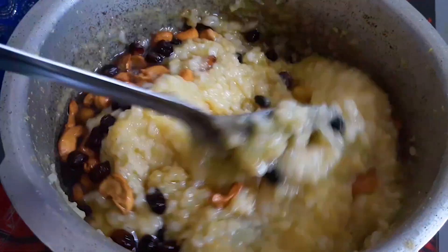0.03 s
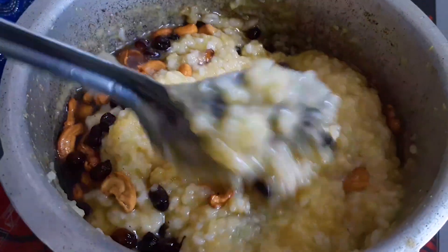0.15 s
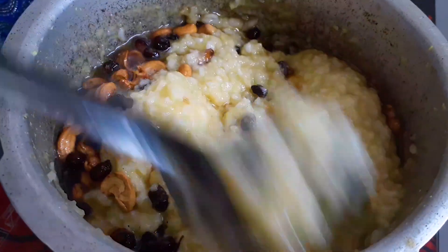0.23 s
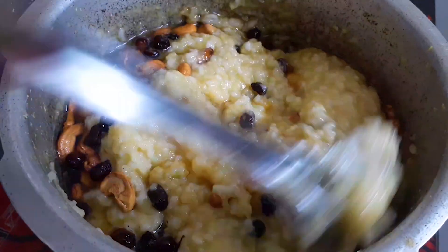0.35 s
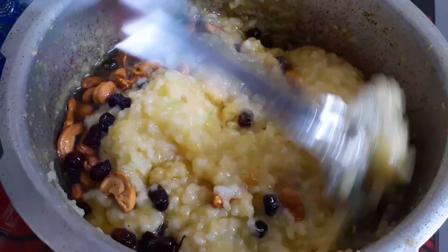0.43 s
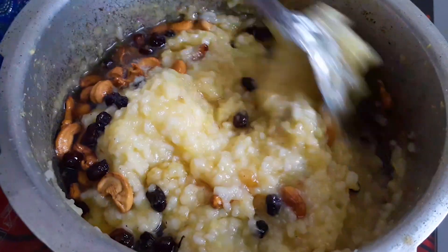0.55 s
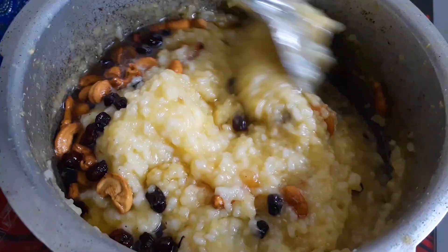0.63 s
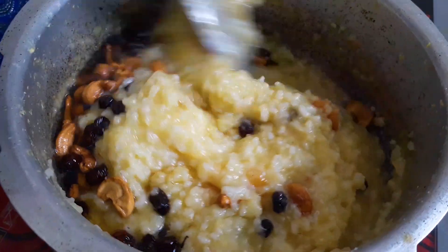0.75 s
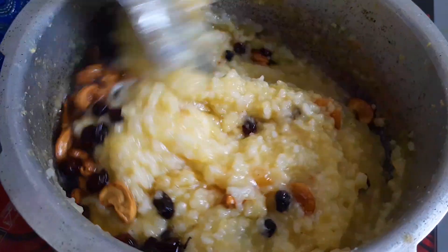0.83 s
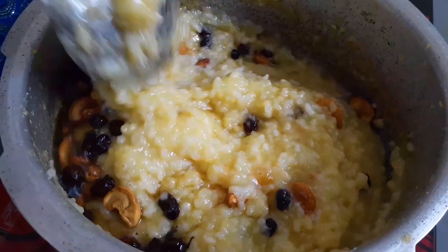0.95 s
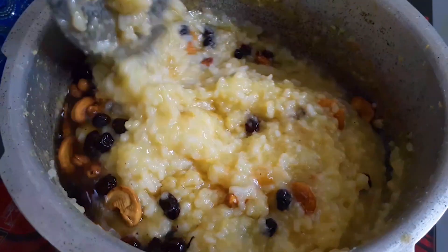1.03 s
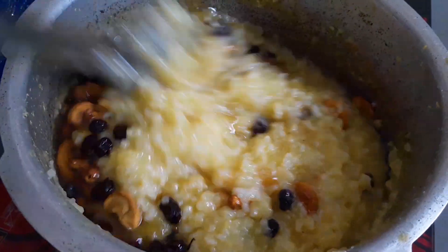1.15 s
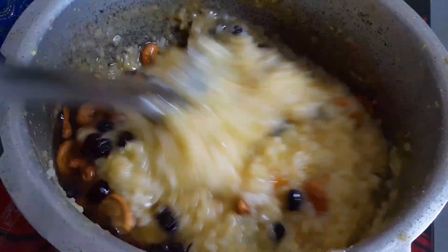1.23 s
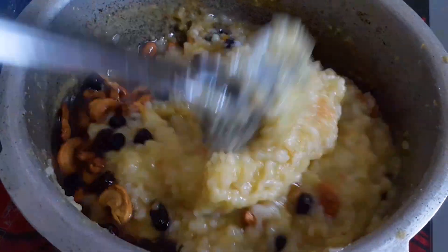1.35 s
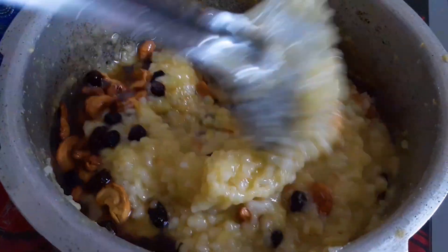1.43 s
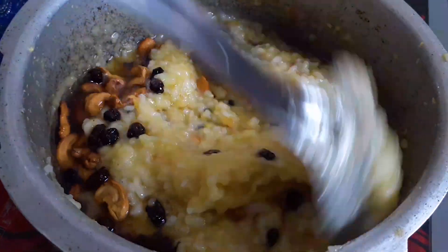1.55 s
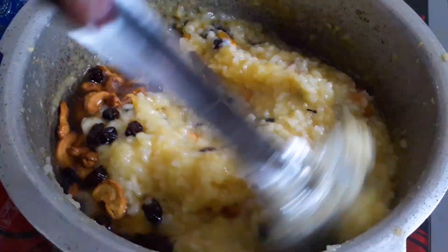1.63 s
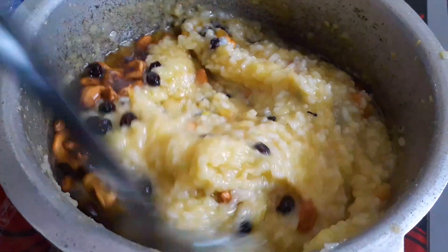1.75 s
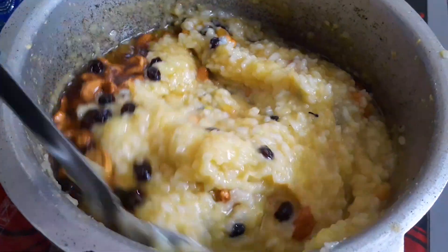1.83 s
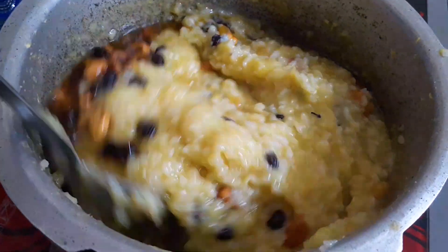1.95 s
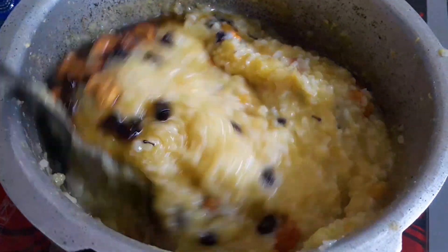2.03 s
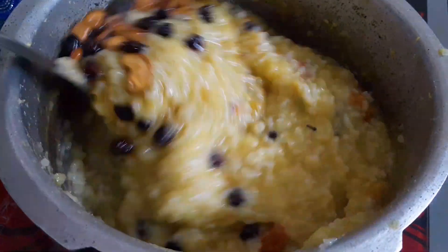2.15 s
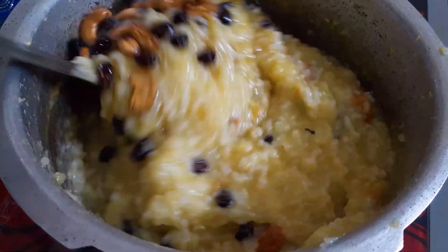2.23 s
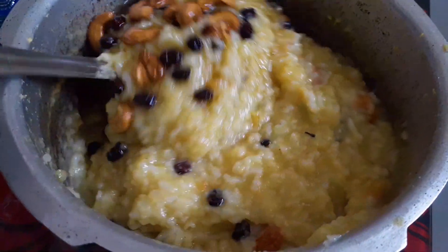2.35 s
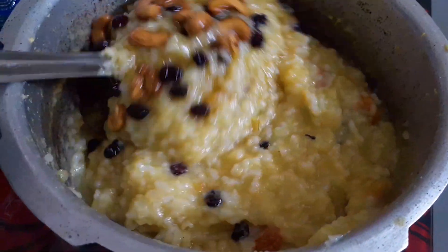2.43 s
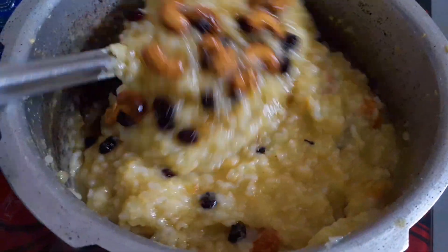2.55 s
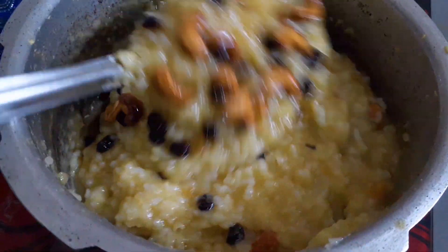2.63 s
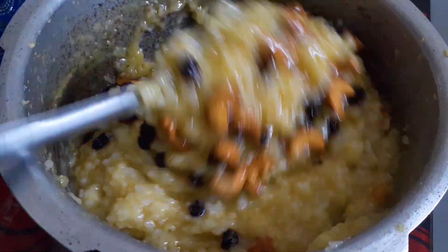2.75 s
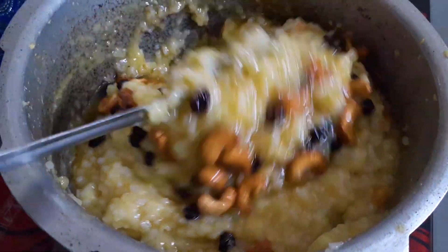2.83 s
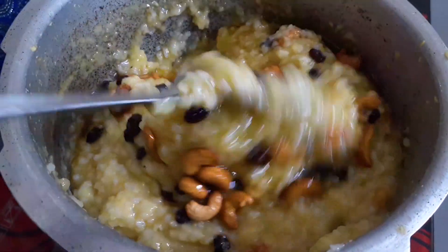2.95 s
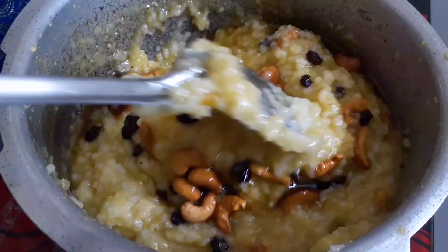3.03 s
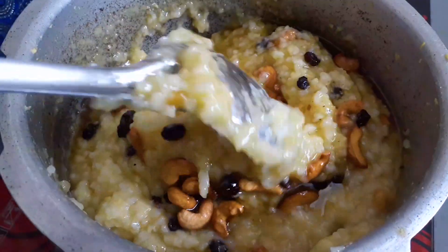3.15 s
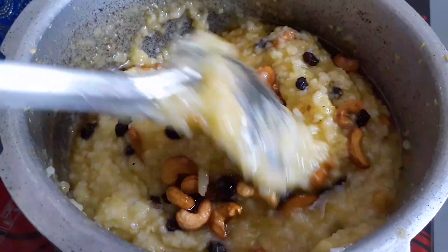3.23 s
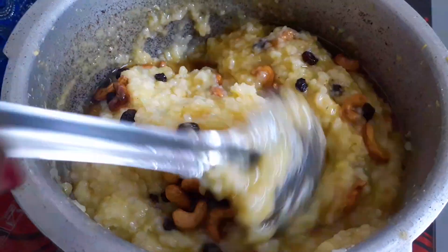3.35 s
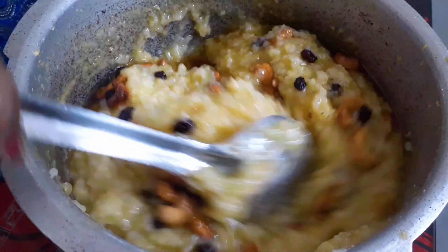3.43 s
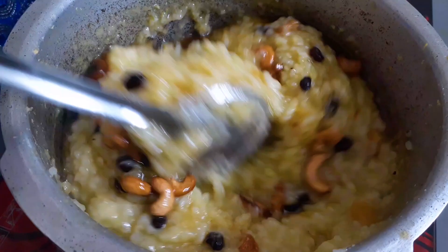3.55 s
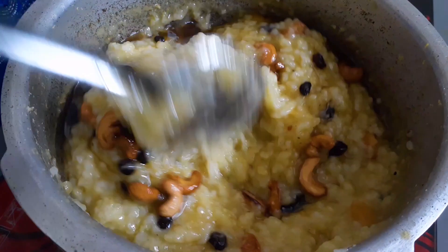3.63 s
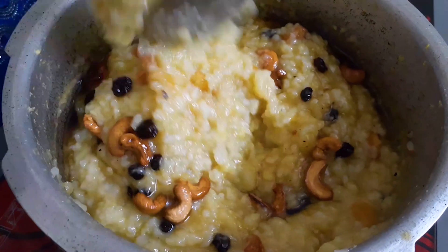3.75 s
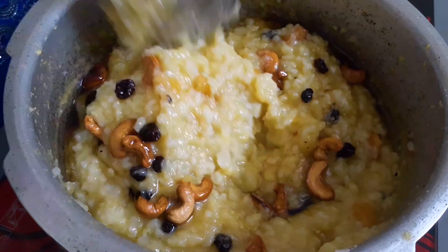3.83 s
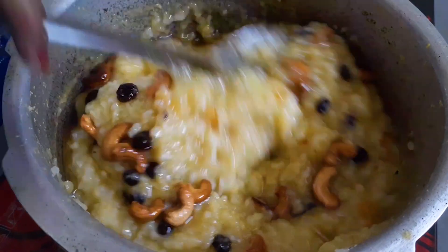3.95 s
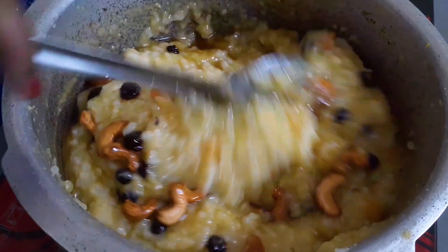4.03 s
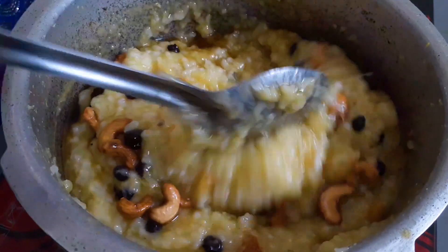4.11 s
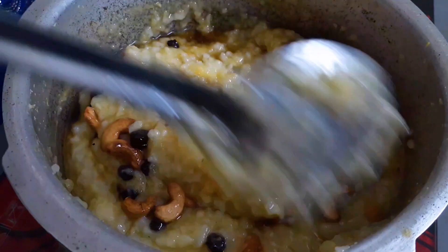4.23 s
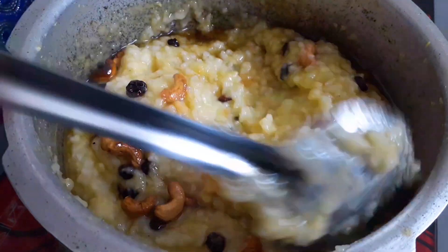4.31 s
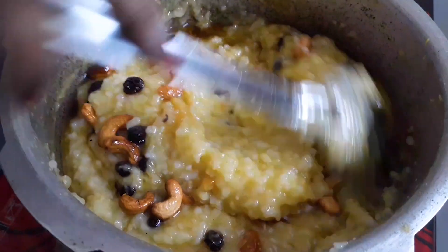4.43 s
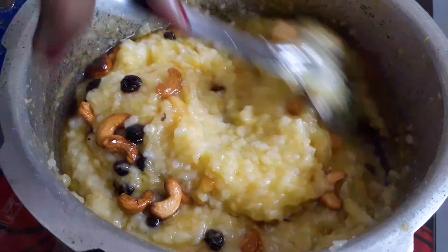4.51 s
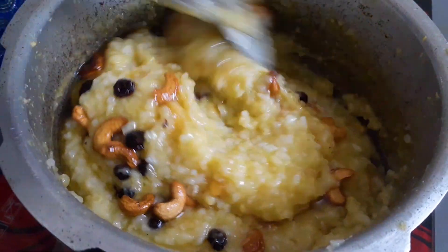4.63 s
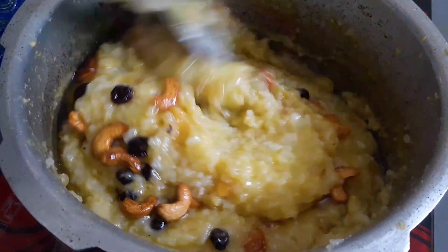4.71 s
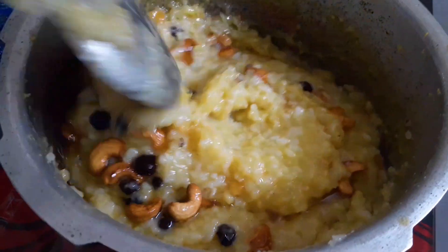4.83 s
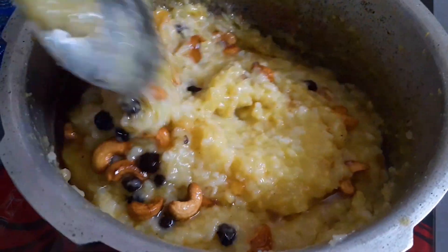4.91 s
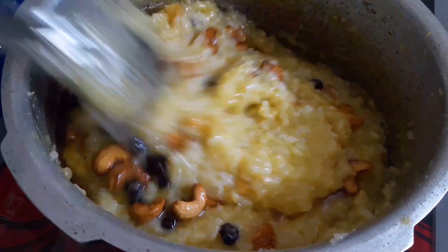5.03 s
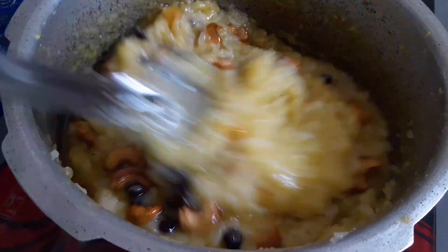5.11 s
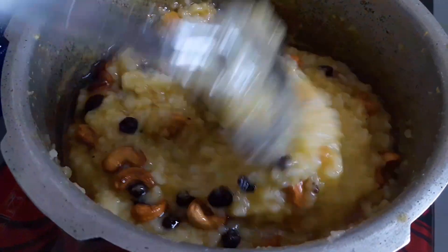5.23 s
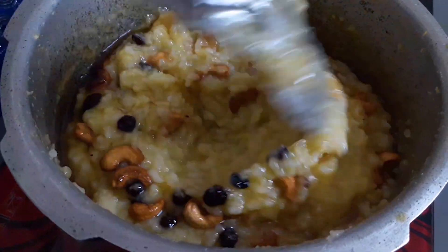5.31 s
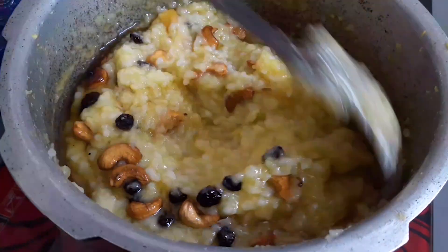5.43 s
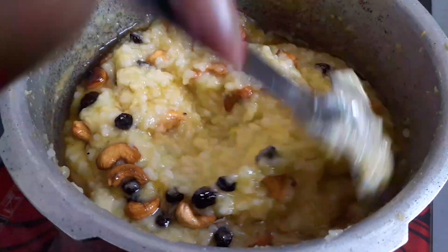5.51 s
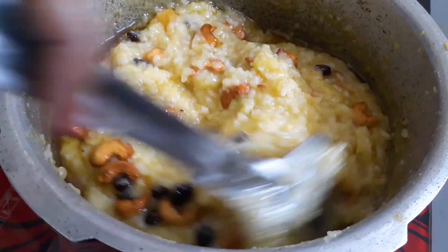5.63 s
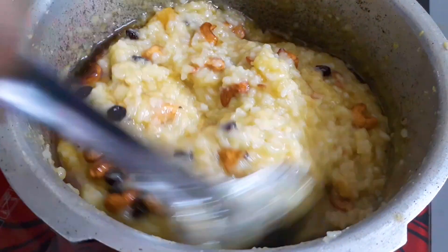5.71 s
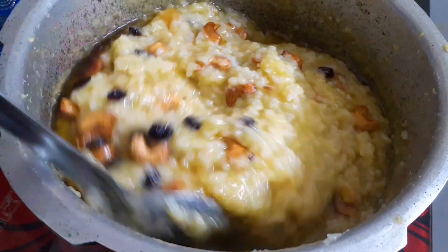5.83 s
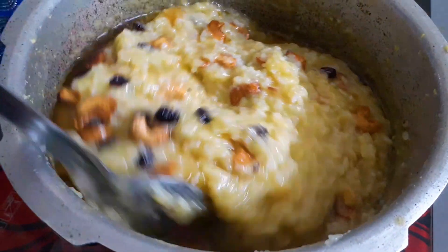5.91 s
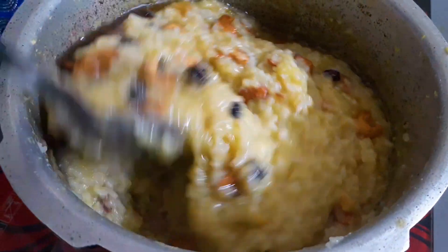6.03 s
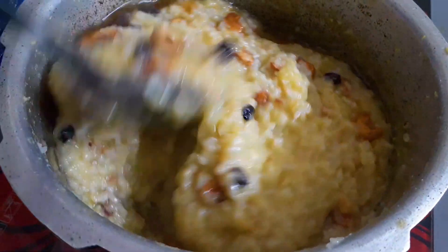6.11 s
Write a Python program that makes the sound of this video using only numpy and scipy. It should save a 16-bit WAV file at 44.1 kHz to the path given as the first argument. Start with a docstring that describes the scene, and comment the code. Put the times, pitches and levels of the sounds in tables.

```python
"""A steel ladle is dragged along the wall of a thick aluminium pot and folds sticky sweet rice over.
First come quick pushes and cracking pops in the tearing wet rice, then just before 2 s the hardest smack.
A long run of scrapes and popping pockets follows, then mostly small pops, then short pushes to the end.
Stick-slip clicks make the damped pot ring; pops are short rings with noise bursts, bubbles soft rising tones.
Random grains make the wet crackle; thuds and room air are noise, and a small hard kitchen answers."""
import sys
import numpy as np
from scipy import signal
from scipy.fft import rfft, irfft
from scipy.io import wavfile

SR = 44100
rng = np.random.default_rng(int(sys.argv[2]) if len(sys.argv) > 2 else 0)


def store_pcm(level_fs):
    """Save levels as 16-bit WAV."""
    pcm = np.round(np.clip(level_fs, -1, 1) * 32767).astype(np.int16)
    wavfile.write(sys.argv[1], SR, np.atleast_2d(pcm).T)


N = 272046

# Colour of the quiet kitchen air. Each row: frequency in Hz, relative level per Hz in dB.
AIR_COLOUR = [(24, -11), (40, 14), (106, 1), (155, 6), (422, -9), (770, -3.5), (831, -10), (1210, -25.5),
              (2840, -29), (12500, -24), (16000, -24.5)]
# The jolted pot thuds on its stand. Each row: start in seconds, level in dB, fade time in seconds.
THUDS = [(.265, -61.5, 0.088), (1.56, -64, 0.084), (1.809, -46, 0.099), (5.46, -61, 0.12),
         (5.82, -49, 0.085)]
# Wet rice tearing apart. Each row: time in seconds, crackle level in dB, tilt toward the treble in dB.
TEARING_RICE = [(0, -57.5, -5.5), (.25, -45, 5), (.45, -63, -6.5), (.65, -36.5, -4.5), (.9, -58, -4),
                (1.25, -64, -2), (1.45, -64, -5.5), (1.55, -47.5, 4), (1.7, -74.5, -15.5),
                (2.1, -56.5, -11), (2.5, -57.5, 2), (3.2, -59, 6), (3.75, -62, 6.5), (4.15, -64, 5.5),
                (4.3, -56.5, 6), (4.65, -58, -2.5), (4.85, -65, 9), (5.3, -67.5, 6.5), (5.55, -50, 0.5),
                (5.98, -83, 13), (6.07, -57, -1), (6.17, -67.5, 7)]
# Colour of the wet crackle. Each row: frequency in Hz, relative level per Hz in dB.
CRACKLE_COLOUR = [(880, -7.5), (1500, -1), (1790, -5), (3180, -4), (3920, -3.5), (5440, -6.5),
                  (14100, -7.5), (16000, -1)]
# Closed air pockets bursting softly. Each row: start in seconds, peak level in dB, starting pitch in Hz.
SOFT_BUBBLES = [(0.609, -33, 3630), (0.732, -31.5, 3680), (.808, -24, 8300), (1.175, -44.5, 1000),
                (1.205, -45, 600), (1.309, -45, 1046), (1.431, -54.5, 910), (1.451, -58, 1020),
                (1.783, -35, 980), (1.799, -35, 990), (1.946, -26.5, 2600), (2.036, -17.5, 720),
                (2.147, -25.5, 704), (2.295, -27.5, 610), (2.326, -28, 720), (2.364, -26, 713),
                (2.398, -28.5, 630), (3.107, -50.5, 12000), (3.152, -42.5, 11520), (3.74, -48.5, 5480),
                (3.957, -48, 3600), (3.992, -47, 6500), (4.354, -55, 5200), (4.446, -43.5, 1300),
                (4.477, -31, 8000), (4.639, -44, 5500), (4.682, -41, 5200), (5.426, -57.5, 580),
                (5.454, -37.5, 580), (5.584, -48, 3050)]
# Cracking smacks and knocks. Each row: start in seconds, peak level in dB before the jolt is added,
# pitch of the air pocket in Hz, level sent to the room in dB relative to that peak.
SMACKS = [(0.2, -35.5, 2700, -10), (0.262, -19, 2960, -9.5), (0.704, -21.5, 800, 0), (.877, -38, 5500, 1),
          (0.906, -36.5, 11800, -5), (1.094, -45.5, 8500, -15), (1.261, -45, 11100, 5),
          (1.483, -40.5, 1150, -2), (1.542, -29.5, 4800, -12), (1.721, -38, 4170, 7.5),
          (1.749, -31, 1400, -5.5), (1.8043, -23, 1463, -3), (1.806, -8.5, 645, -10), (1.985, -28, 990, 4),
          (2.244, -34.5, 766, -8), (2.38, -26.5, 3000, -9), (2.548, -36, 550, -27), (2.709, -33, 714, -2),
          (2.875, -43.5, 12000, -22), (2.935, -34, 3660, -5.5), (2.972, -42.5, 4280, -9),
          (3.042, -35, 1273, -8.5), (3.192, -39, 13700, -12), (3.214, -45, 8700, -5),
          (3.239, -49, 5680, 6.5), (3.303, -43, 2610, -3), (3.339, -49.5, 6030, -15),
          (3.383, -49, 7800, -8.5), (3.424, -39.5, 1490, -3.5), (3.528, -49.5, 4480, -6.5),
          (3.572, -41, 2910, -3), (3.826, -35, 5350, 2), (3.89, -45, 14300, -18.5),
          (4.011, -40.5, 3460, 1.5), (4.275, -36.5, 12000, 4.5), (4.584, -28, 2100, -8),
          (4.755, -45.5, 4230, 7.5), (5.28, -48, 1850, -1.5), (5.446, -41.5, 1900, 8),
          (5.82, -27, 1174, -19), (6.019, -45.5, 3580, -3), (6.054, -36, 2930, -8)]
# Ways the pot can ring, in four groups. Each row: frequency in Hz, width in Hz, relative level in dB.
DEEP_RINGS = [(63.17, 6, -18), (150.2, 9.3, -2.5), (173.4, 12, -1.5)]
LOW_RINGS = [(293, 26, 1.5), (327, 20, 2.5), (500, 20, -2)]
MID_RINGS = [(580, 40, -12), (642, 25, -16), (720, 11, -17.5), (983, 350, -9.5), (1120, 52, -8.5),
             (1300, 85, -16.5), (1500, 90, -11)]
HIGH_RINGS = [(2380, 930, 13.5), (2810, 500, 1), (3760, 230, -1.5), (4250, 1700, 8.5), (4800, 30000, -24),
              (10900, 18000, 2.5)]
# Pushes of the ladle along the pot. Each row: moment of full strength in seconds, rise in seconds,
# hold in seconds, scrape level in dB, then the deep, low and gritty high rings in dB relative to the scrape,
# main ring in Hz, upper ring in Hz.
PUSHES = [(0.286, 0.033, 0.036, -65, -7, -29, 16, 1300, 3500),
          (0.436, 0.023, .06, -47, -21, -28, -2, 500, 1388),
          (0.532, 0.042, 0.03, -34.5, -18.5, -3.5, -2.5, 1150, 2150),
          (.58, 0.029, .04, -34.5, -11.5, 0, -5, 1200, 3800),
          (0.657, 0.04, 0.055, -35.5, -26, -0.5, -6, 712, 1712),
          (1.179, 0.028, .05, -57.5, -38, -35, -1, 648.4, 1200),
          (1.83, 0.018, 0.0084, -35, -11, -4, -8.5, 679, 1403),
          (1.955, 0.016, .01, -39, -5.5, -2, -5, 950, 2600),
          (1.995, 0.036, 0.017, -36.5, -13, -5.5, 2.5, 885, 2785),
          (2.041, 0.057, 0.0064, -28, -18, -21, -18.5, 747, 2436),
          (2.107, 0.052, 0.096, -34, -3.5, -2.5, -1.5, 685, 1343),
          (2.3, 0.14, 0.048, -40.5, -0.5, 2.5, -31, 720, 2527),
          (2.379, 0.058, 0.0092, -40, -21, -27, -3.5, 615, 2000),
          (2.47, 0.048, .015, -49.5, -7, -13, -18, 616, 1000),
          (2.553, .012, 0.065, -47, -25, -27, -0.5, 629, 900),
          (2.724, 0.03, 0.03, -49.5, -7.5, -2.5, -10.5, 713, 2525),
          (4.383, 0.032, .02, -46, -19, -12, 0.5, 2291, 2270),
          (4.435, 0.05, 0.015, -50, -7, -8, -14, 610, 5000),
          (4.501, .03, .04, -57, -11, 3.5, -21, 475, 1493),
          (4.59, 0.027, 0.015, -46, -28, -27, 5, 1500, 2300),
          (5.282, 0.0069, 0.031, -55.5, -37, -37, -21, 1900, 1893),
          (5.462, 0.012, .012, -49.5, -14, 0.5, -12, 597, 2000),
          (5.491, 0.013, .015, -48.5, -8.5, 4, 1, 1150, 2000),
          (5.549, 0.038, .03, -70, 1, 16, -16, 559, 1948), (5.704, 0.036, 0.01, -52, -6, 4, 4, 718, 1382),
          (5.819, 0.0078, 0.016, -42, -7.5, -17, -3.5, 1120, 2500),
          (5.875, .03, .02, -48.5, -3.5, 1, -5, 922, 1961)]

RISE_DB = 17.5   # a push climbs this much during its rise
FALL_DB_PER_S = [[181.5], [189], [205], [166]]   # fade of middle, deep, low and high rings after the hold
CRACK_DB = -5   # crack of a pop relative to its splash
BUBBLE_ROOM_DB, SCRAPE_ROOM_DB = -6, -13.5   # sent to the room, relative to the direct source
ROOM_T60_S, TREBLE_T60_S = 0.47, 0.051   # time to fall 60 dB; the treble has both fades at once
ROOM_DULL_HZ, ALIKE_BELOW_HZ = 7100, 5100   # where the room treble starts; ports are alike in the bass
AIR_DB = -74
LEAN_DB = 1.5   # scrapes are this much louder on the left: that port is the more sensitive
RIGHT_LAG = 8   # samples by which the right port hears the pot later
CUTOFF_HZ = 16500


def from_db(db):
    """Turn a level in dB into a gain."""
    return 10 ** (np.asarray(db) / 20)


def rms_one(x):
    """Scale a sound so that its average strength (rms) is 1."""
    return x / np.sqrt(np.mean(x ** 2) + 1e-20)


def in_time(rows):
    """Draw straight lines through the columns of a table, one value a sample."""
    seconds, *columns = np.transpose(rows)
    return [np.interp(np.arange(N) / SR, seconds, column) for column in columns]


def drift(rate_hz):
    """Wander slowly at random around zero, with spread 1."""
    r = np.exp(-80 * np.pi * rate_hz / SR)   # one step every 40 samples
    noise = rng.standard_normal(N // 40 + 2002)
    slow = signal.lfilter([1], [1, -2 * r, r * r], noise)[2000:]   # skip the settling
    return np.interp(np.arange(N) / 40, np.arange(len(slow)), rms_one(slow))


def shaped(x, colour):
    """Colour a sound by making each frequency louder or softer; rms 1."""
    hz, db = np.transpose(colour)
    bins_hz = np.arange(N // 2 + 1) * SR / N + 1
    gain = from_db(np.interp(np.log(bins_hz), np.log(hz), db))
    return rms_one(irfft(rfft(x) * gain, N))


def resonate(x, hz, width_hz):
    """Let one resonance ring; a narrow one rings longer, and its peak gain is about 1."""
    r = np.exp(-np.pi * width_hz / SR)
    feedback = [1, -2 * r * np.cos(2 * np.pi * hz / SR), r * r]
    return signal.lfilter([(1 - r * r) / 2, 0, (r * r - 1) / 2], feedback, x)


def grains(per_s, spread_db, shape):
    """Scatter single-sample clicks of uneven size and random sign."""
    size_db = spread_db * np.minimum(rng.exponential(1, shape), 3.5)
    sizes = from_db(size_db) * rng.choice([-1, 1], shape)
    return sizes * (rng.random(shape) < per_s / SR) + 1e-18


def two_ports(pair):
    """Make two unrelated signals alike in the bass, as close microphone ports hear a room."""
    mid, side = pair
    side = signal.lfilter(*signal.butter(1, ALIKE_BELOW_HZ, "high", fs=SR), side)
    return np.array([mid + side, mid - side]) / np.sqrt(2)


def kitchen_air():
    """Steady coloured noise is the quiet air of the kitchen."""
    return from_db(AIR_DB) * two_ports(shaped(rng.standard_normal((2, N)), AIR_COLOUR))


def kitchen(x):
    """Hard walls return dense echoes that die away, the treble first."""
    t = np.arange(SR // 2) / SR
    fade = from_db(-60 * t / ROOM_T60_S) * np.clip(t / .008, 0, 1)   # swells in over 8 ms
    echoes = rng.standard_normal((2, len(t))) * fade
    dull = signal.lfilter(*signal.butter(1, ROOM_DULL_HZ, fs=SR), echoes)
    treble = (echoes - dull) * from_db(-60 * t / TREBLE_T60_S)
    echoes = two_ports(dull + treble)
    echoes = echoes / np.sqrt(np.sum(echoes ** 2) / 2)
    return signal.fftconvolve(x[None], echoes, axes=1)[:, :N]


def pot_walls(pair):
    """The open pot throws a few quick treble echoes, other ones to each port."""
    out = pair.copy()
    bright = signal.lfilter(*signal.butter(2, 1700, "high", fs=SR), pair)
    for port, lags in enumerate(rng.integers(12, 220, (2, 14))):   # lags in samples
        for k, lag in enumerate(lags):
            out[port, lag:] += (-1) ** k * from_db(-16.0) * bright[port, :-lag]
    return out


def thumps():
    """The pot thuds on its stand: dull bass noise that swells quickly and dies."""
    t = np.arange(N) / SR
    bass = signal.butter(2, [50, 120], "band", fs=SR, output="sos")
    rumble = rms_one(signal.sosfilt(bass, rng.standard_normal(N)))
    strength = np.zeros(N)
    for s, db, fade_s in THUDS:
        swell = np.clip((t - s) / 0.019, 0, 1)
        strength += from_db(db) * swell * np.exp(-np.clip(t - s, 0, None) / fade_s)
    return rumble * strength


def squelch():
    """Parting wet grains make a fine, wide hiss, with lone ringing ticks of tiny bubbles on top."""
    level_db, tilt_db = in_time(TEARING_RICE)
    hiss = shaped(grains(9000.0, 2.5, (2, N)), CRACKLE_COLOUR) * from_db(2.5 * drift(12))
    born = grains(110.0, 3.5, N)
    dealt = rng.integers(0, 8, N)   # each tick gets one of eight pitches
    ticks = np.zeros(N)
    for k, hz in enumerate(np.geomspace(3000, 14000, 8)):
        ticks += resonate(born * (dealt == k), hz, 0.094 * hz)
    both = hiss + from_db(-11.0) * rms_one(ticks)
    bright = signal.sosfilt(signal.butter(2, 4800, "high", fs=SR, output="sos"), both)
    return from_db(level_db) * (bright + from_db(-tilt_db) * (both - bright))


def bubbles():
    """Each air pocket swells into a short tone of slightly rising pitch, with no crack."""
    out, t = np.zeros(N + 1024), np.arange(1024) / SR
    for s, db, hz in SOFT_BUBBLES:
        tone = np.sin(2 * np.pi * hz * t * (1 + 8.0 * t))
        ring = tone * np.exp(-t * (150.0 + 0.53 * hz)) * (1 - np.exp(-t * 0.5 * hz))
        at = round(s * SR)
        out[at:at + 1024] += from_db(db) * ring / np.abs(ring).max()
    return out[:N]


def pops():
    """Each pop rings its air pocket, bursts with a crack and jolts the pot; near and as sent to the room."""
    size = 1024
    out, jolts = np.zeros((2, N + size)), np.zeros(N)
    t = np.arange(size) / SR
    bursts = rng.standard_normal((len(SMACKS), size))
    for (s, db, hz, room_db), burst in zip(SMACKS, bursts):
        overtone = .6 * np.sin(2 * np.pi * min(2.1 * hz, 15000) * t)
        ring = (np.sin(2 * np.pi * hz * t) + overtone) * np.exp(-t * (130.0 + .3 * hz))
        splash = resonate(burst * np.exp(-t / .0016), hz, 1.1 * hz)
        # differences between neighbouring samples make the noise sharp
        crack = np.diff(burst, prepend=0) * np.exp(-t / .0012) * np.clip(t / .0004, 0, 1)
        pop = 0.78 * ring / ring.max() + splash / np.abs(splash).max()
        pop += from_db(CRACK_DB) * crack / np.abs(crack).max()
        at = round(s * SR)
        out[:, at:at + size] += from_db([[db], [db + room_db]]) * pop / np.abs(pop).max()
        jolts[at] = from_db(db)
    jolt = np.zeros(N)
    for hz, width, db in MID_RINGS + HIGH_RINGS:
        jolt += from_db(db) * resonate(jolts, hz, width) * 1000 / width   # lift the narrow rings
    return out[:, :N] + from_db([[-4.0], [-15.0]]) * jolt


def pot_modes(rub, modes, wander_db):
    """The contact point travels, so each mode swells and fades on its own; rms 1."""
    total = 0
    for k, (hz, width, db) in enumerate(modes):
        gain = (-1) ** k * from_db(db + wander_db * drift(4.07))
        total = total + gain * rms_one(resonate(rub, hz, width))
    return rms_one(total)


def moving_ring(rub, centre_hz, sharpness):
    """The wall left free by the rice rings at a pitch that follows the ladle; rms 1."""
    out, state = np.zeros(N), np.zeros(2)
    for i in range(0, N, 256):   # the pitch is renewed every 256 samples
        w = 2 * np.pi * centre_hz[i] / SR
        r = np.exp(-w / (2 * sharpness[i]))
        feedback = [1, -2 * r * np.cos(w), r * r]
        piece = rub[i:i + 256] * np.sin(w)
        out[i:i + 256], state = signal.lfilter([(1 - r) ** .5], feedback, piece, zi=state)
    return rms_one(out)


def pushes():
    """Each push rises, holds and fades; levels add as power and the ring pitches follow the loudest."""
    t = np.arange(0, N + 64, 64) / SR
    power, rings = 1e-14, 0
    for s, rise, hold, db, deep_db, low_db, high_db, *hz in PUSHES:
        rise_db = -RISE_DB * np.clip((s - t) / rise, 0, None) ** 2
        shape_db = rise_db - np.array(FALL_DB_PER_S) * np.clip(t - s - hold, 0, None)
        group_db = np.array([[0], [deep_db], [low_db], [high_db]])
        power = power + from_db(db + shape_db + group_db) ** 2
        rings = rings + np.outer(hz, from_db(db + shape_db[0]) ** 2)
    ring_hz = np.maximum(rings / power[0], 200)
    return [np.interp(np.arange(N) / SR, t, c) for c in (*np.sqrt(power), *ring_hz)]


def scrape():
    """Dense stick-slip clicks, coming in lumps, drive the pot; each port hears partly other grit."""
    level, deep_level, low_level, high_level, ring_hz, upper_hz = pushes()
    lumps = from_db(1.0 * drift(25) + 4.5 * np.tanh(.8 * drift(110)))
    rub, *others = grains(1300.0, 3.5, (3, N)) * lumps

    # a light touch near the rim squeaks and leaves the body still
    firm = np.clip((1750 - ring_hz) / 350, .03, 1)
    squeak = moving_ring(rub, ring_hz, sharpness=12.0 + 9.9 * (1 - firm))
    mid = firm * pot_modes(rub, MID_RINGS, wander_db=5.5) + from_db(-1.0) * squeak
    deep = deep_level * pot_modes(rub, DEEP_RINGS, wander_db=3.5)
    low = low_level * pot_modes(rub, LOW_RINGS, wander_db=4.5)

    grit = rub + from_db(6.5) * np.array(others)   # one row for each port
    sharpness = np.full(N, 6.0)
    upper = from_db(-8.0) * np.array([moving_ring(g, upper_hz, sharpness) for g in grit])
    high = high_level * pot_modes(grit, HIGH_RINGS, wander_db=6.0)
    return level * (rms_one(mid) + upper) + deep + low + high


def scene():
    """The pot stands off to one side of the two ports; the kitchen surrounds it."""
    scrapes, (smacks, sent), pockets = scrape(), pops(), bubbles()
    pot = scrapes * from_db([[LEAN_DB / 2], [-LEAN_DB / 2]])
    pot = pot + (smacks + pockets) * from_db([[4.5], [1.5]])   # left, right
    pot[1] = np.concatenate([np.zeros(RIGHT_LAG), pot[1, :-RIGHT_LAG]])
    pot = pot_walls(pot)
    room = kitchen(from_db(SCRAPE_ROOM_DB) * scrapes[0] + sent + from_db(BUBBLE_ROOM_DB) * pockets)
    background = (squelch() + kitchen_air() + thumps()) * from_db([[1.2], [-1.2]])
    return pot + room + background


def record(dry):
    """The deepest bass and the top are cut."""
    dry = signal.sosfilt(signal.butter(6, 47, "high", fs=SR, output="sos"), dry)
    return signal.sosfilt(signal.cheby2(14, 60, CUTOFF_HZ, fs=SR, output="sos"), dry)


dry = scene()
out = record(dry)
store_pcm(out)
```